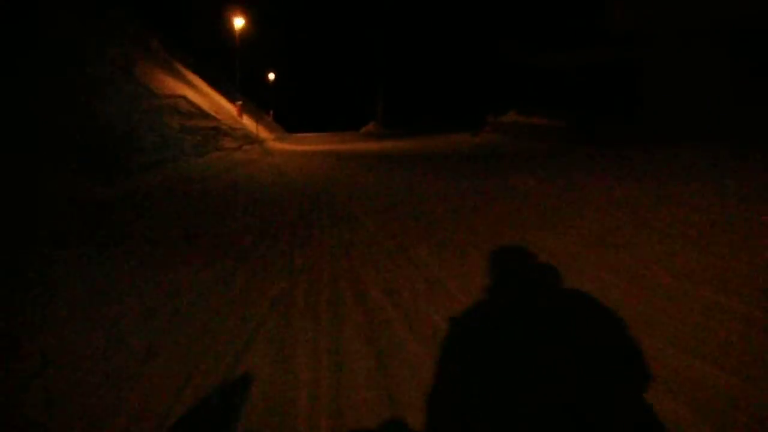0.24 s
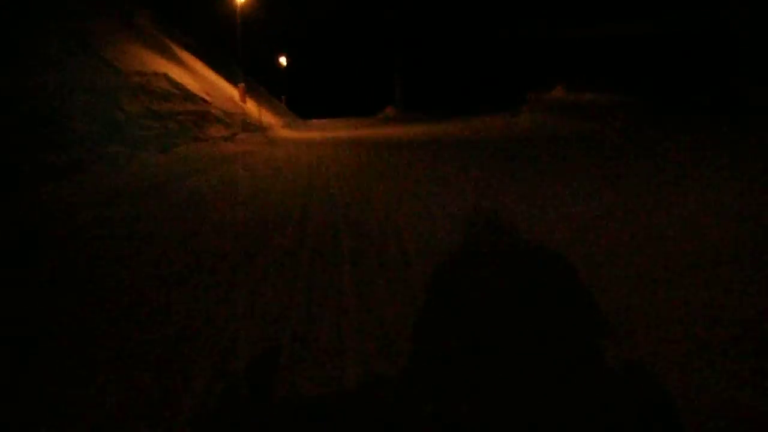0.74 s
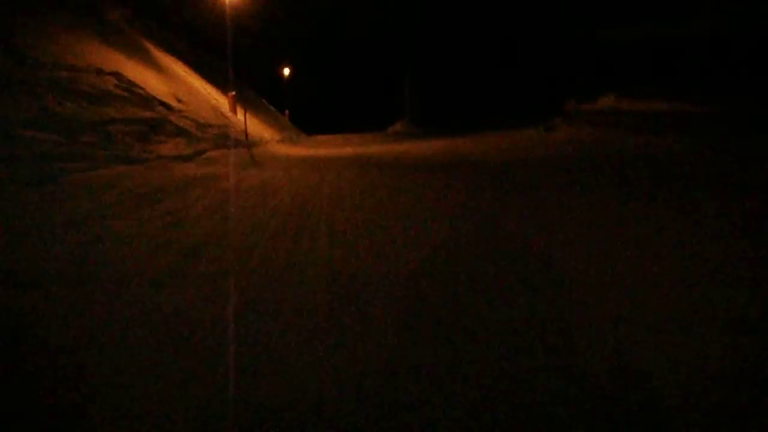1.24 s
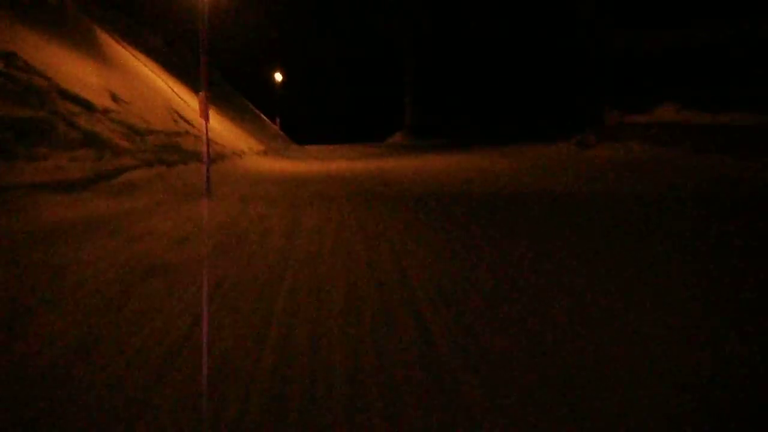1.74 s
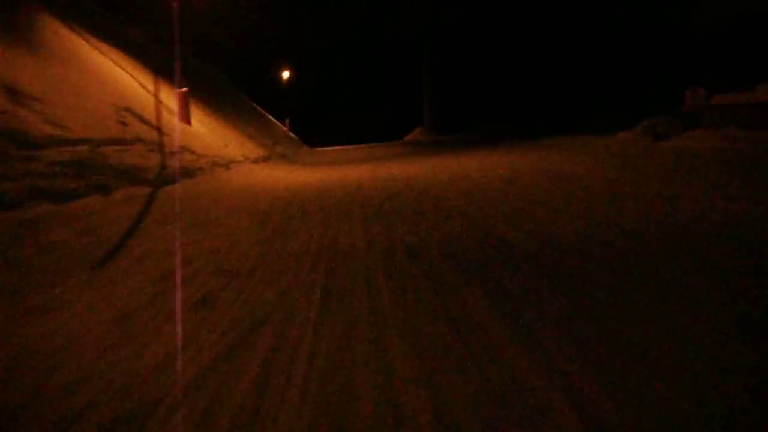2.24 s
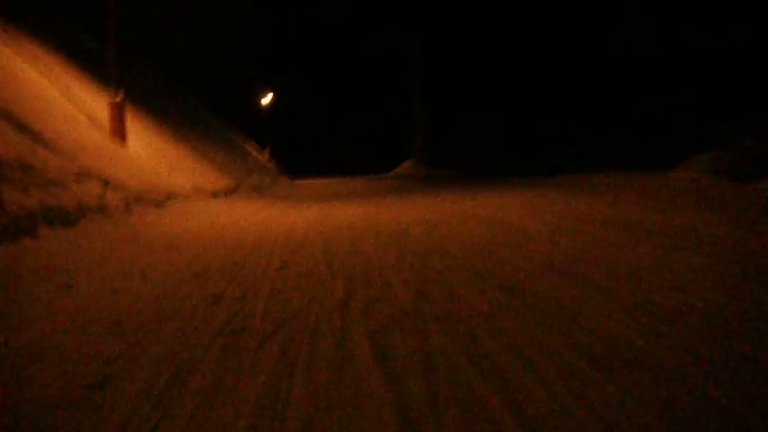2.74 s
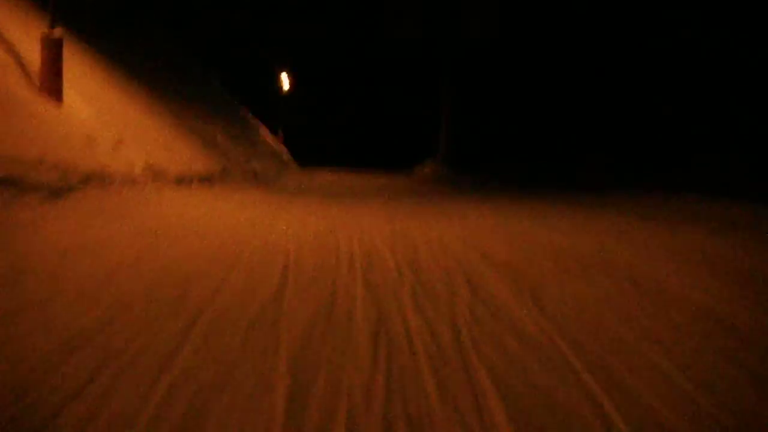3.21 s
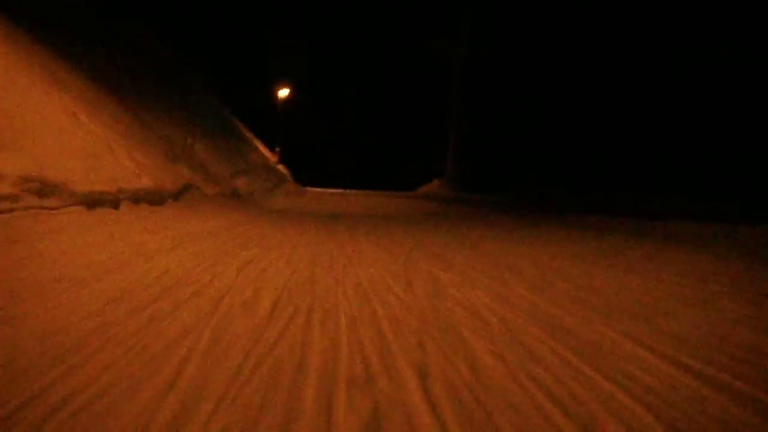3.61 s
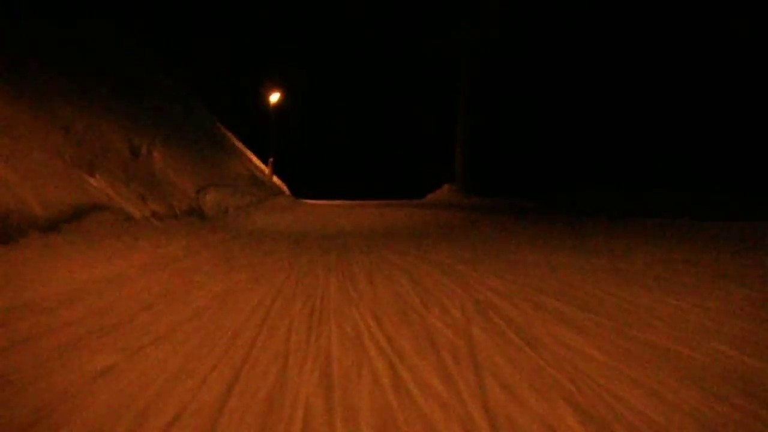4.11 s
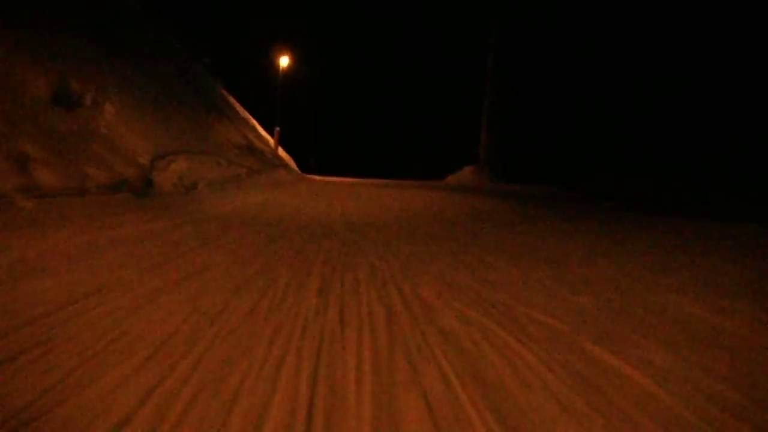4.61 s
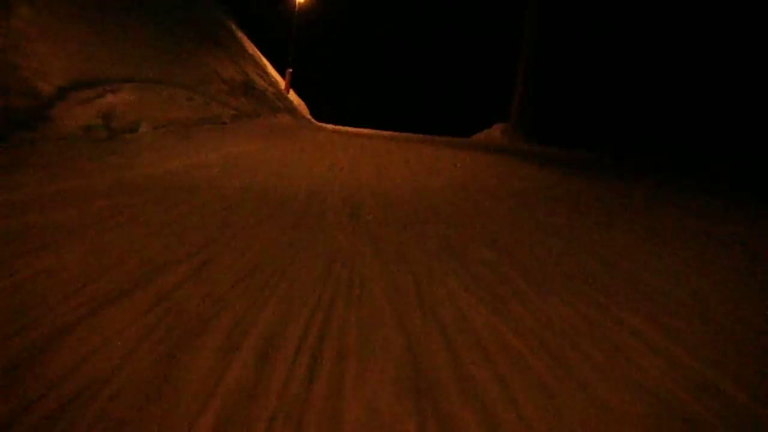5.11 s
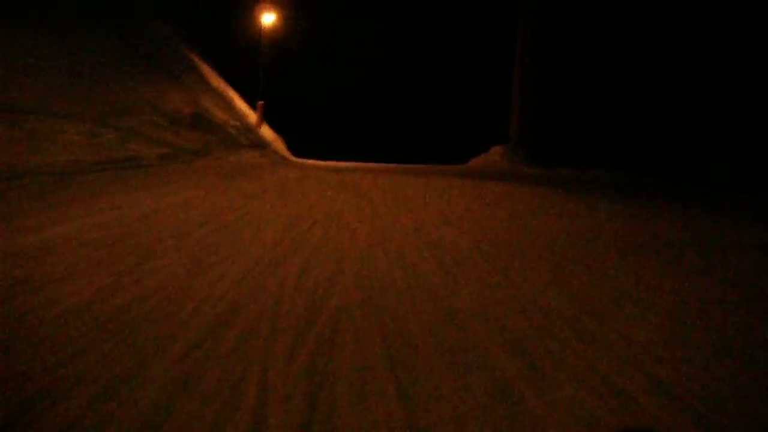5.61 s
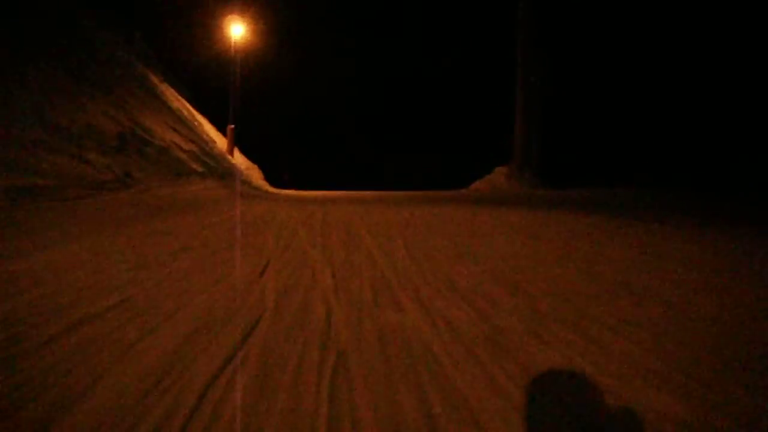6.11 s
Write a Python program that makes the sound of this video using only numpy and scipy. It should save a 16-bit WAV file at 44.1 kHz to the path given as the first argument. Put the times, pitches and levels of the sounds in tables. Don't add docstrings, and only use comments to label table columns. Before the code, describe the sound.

Outdoors at night, a sled slides down packed snow with a dense, bright hiss and gritty scrape. Just before one second the frame squeaks, bangs on a ridge and lifts; the friction drops while loose parts rattle, then returns with a ringing landing. Ice lumps tick and snap through the rest of the run. A small enclosed mono camera on board adds boxy resonance, wind rumble and rushing air.

```python
import sys
import numpy as np
from scipy import signal
from scipy.fft import rfft, irfft
from scipy.io import wavfile

SR = 44100
rng = np.random.default_rng(int(sys.argv[2]) if len(sys.argv) > 2 else 0)


def log_audio(samples):
    frames = np.atleast_2d(samples).T
    limited = np.clip(frames, -1, 1)
    pcm = np.round(limited * 32767).astype(np.int16)
    wavfile.write(sys.argv[1], SR, pcm)


def gain_from_db(level_db):
    decades = np.asarray(level_db, float) / 20
    return 10 ** decades


N = 280035


def rms_one(x):
    return x / np.sqrt(np.mean(x ** 2) + 1e-20)


def in_time(rows):
    s, *columns = np.transpose(rows)
    return [np.interp(np.arange(N) / SR, s, column) for column in columns]


def drift(rate):
    pole = np.exp(-32 * np.pi * rate / SR)
    settling = 3000
    noise = rng.standard_normal(N // 16 + settling + 2)
    slow = signal.lfilter([1], [1, -2 * pole, pole * pole], noise)[settling:]
    return np.interp(np.arange(N) / 16, np.arange(len(slow)), rms_one(slow))


def swell(t, rise):
    age = t / max(rise, 0.0005)
    return age ** 2 * np.exp(2 - 2 * age)


def colour(x, spectrum):
    # (frequency [Hz], width [Hz], boost [dB])
    case_modes = [(2050, 280, 2), (2540, 95, 0), (3120, 120, 2), (3700, 220, 2.5), (4460, 160, 0.5),
                  (5700, 120, -3.5), (5860, 180, 3), (7750, 300, -1), (8100, 440, 1), (8840, 250, -0.5),
                  (12030, 420, 3.5)]
    size = 2 ** 14
    hz = np.fft.rfftfreq(size, 1 / SR) + 1
    at, level_db = np.transpose(spectrum)
    octaves_outside = np.maximum(np.log2(at[0] / hz), 0) + np.maximum(np.log2(hz / at[-1]), 0)
    db = np.interp(np.log(hz), np.log(at), level_db)
    db = db - np.minimum(30 * octaves_outside, 60)
    db = db + sum(boost_db / (1 + (2 * (hz - f) / width) ** 2) for f, width, boost_db in case_modes)
    cepstrum = irfft(db * np.log(10) / 20)[:size // 2]
    cepstrum[1:] *= 2
    response = irfft(np.exp(rfft(cepstrum, size)))[:size // 2]
    return signal.fftconvolve(x, response / np.sqrt(np.sum(response ** 2)))[:N]


def whines():
    # (frequency [Hz], level [dB], phase wander [rad])
    tones = [(11719, -53, 1.5), (15734.3, -59.5, .05)]
    t = np.arange(N) / SR
    return sum(np.sqrt(2) * gain_from_db(level_db) * np.sin(2 * np.pi * hz * t + wander * drift(4.6))
               for hz, level_db, wander in tones)


def air():
    # (frequency [Hz], density [dB per Hz])
    air_spectrum = [(590, -51), (1000, -13), (1380, -12), (1500, -4), (1750, -3), (3220, -1), (4170, -6),
                    (5750, 0), (6330, -12), (8280, -2), (13000, -27)]
    level_db = -36.5
    return gain_from_db(level_db + 3.1 * drift(12)) * rms_one(colour(rng.standard_normal(N), air_spectrum))


def rumble(shake_db):
    # (frequency [Hz], density [dB per Hz])
    rumble_spectrum = [(12, -12), (20, -0.5), (49, -3), (96, -8.5), (227, -6), (396, -9.5), (533, -8),
                       (770, -15.5), (1110, -19.5), (1300, -29), (1690, -51), (2860, -120)]
    mean_pressure_db, fade_db_per_s = -40, 0.5
    level_db = mean_pressure_db - fade_db_per_s * np.arange(N) / SR + shake_db
    flicker_db = 0.23 * drift(15) + 0.89 * drift(40)
    return gain_from_db(level_db + flicker_db) * rms_one(colour(rng.standard_normal(N), rumble_spectrum))


def thumps():
    # (time [s], peak [dB], pitch [Hz])
    jolts = [(.737, -28.5, 267), (.902, -29, 490), (.926, -22, 230), (.928, -23, 510), (1.031, -45, 200),
             (1.372, -29, 250), (2.357, -31, 320), (2.372, -33, 710), (3.797, -36, 320),
             (5.032, -30.5, 454), (5.329, -39, 320)]
    rise_s = 0.0028
    out, t = np.zeros(N), np.arange(SR // 20) / SR
    for s, peak_db, hz in jolts:
        out[round(s * SR):][:len(t)] += gain_from_db(peak_db) * swell(t, rise_s) * np.sin(2 * np.pi * hz * t)
    return out


def creak():
    # (time [s], pitch [Hz], level [dB])
    squeak = [
        (.848, 1450, -60),
        (.856, 1460, -34),
        (.88, 1510, -32),
        (.9, 1500, -37),
        (.913, 1500, -29),
        (.93, 1510, -60),
    ]
    hz, level_db = in_time(squeak)
    phase = 2 * np.pi * np.cumsum(hz + 45 * drift(120)) / SR
    return np.sqrt(2) * gain_from_db(level_db + 4.0 * drift(150)) * np.sin(phase)


def cracks(events, spectrum, crunch_db, ring_db, thud_db, thud_hz):
    crunch, tones, t = np.zeros(N), np.zeros(N), np.arange(SR // 20) / SR
    draws = rng.standard_normal((len(events), len(t)))
    for (s, peak_db, ring_hz, rise), noise in zip(events, draws):
        start = round(s * SR)
        at = slice(start, start + len(t))
        shape = gain_from_db(peak_db) * swell(t, rise)
        ring = gain_from_db(ring_db) * np.sin(2 * np.pi * ring_hz * t)
        thud = gain_from_db(thud_db) * np.sin(2 * np.pi * thud_hz * t)
        crunch[at] += gain_from_db(crunch_db) * shape * noise
        tones[at] += shape * (ring + thud)
    return tones + colour(crunch, spectrum)


def frame_impacts():
    # (time [s], peak [dB], ring [Hz], rise [s])
    knock = [
        (.885, -14, 3200, .0026),
        (.8965, -10, 8000, .0034),
        (.902, -5.5, 2200, .0033),
        (.9095, -9, 2370, .004),
        (.926, -1, 2470, .003),
        (.9292, 4, 4750, .0011),
        (.9335, -2.5, 3000, .0024),
    ]
    # (time [s], peak [dB], ring [Hz], rise [s])
    rattle = [
        (.9625, -13, 3350, .003),
        (.9755, -14, 2490, .0017),
        (.982, -16, 3160, .002),
        (.992, -14, 2710, .002),
        (1.0, -16, 4300, .002),
        (1.031, -18, 1800, .0035),
    ]
    # (frequency [Hz], density [dB per Hz])
    knock_spectrum = [(590, -51), (1000, -21), (1820, -2), (2820, -5.5), (3120, -1), (3600, -8.5),
                      (4900, -3), (6180, -9), (7880, -8.5), (10900, -12), (14000, -51)]
    return cracks([*knock, *rattle], knock_spectrum, crunch_db=-12.5, ring_db=-16.5, thud_db=-38, thud_hz=490)


def ice_lumps():
    # (time [s], peak [dB], ring [Hz])
    lumps = [(0.353, -7, 2540), (.414, -9, 3120), (0.462, -7, 2570), (1.1094, -19.5, 2600),
             (1.324, -7.5, 2550), (1.379, -13, 3000), (1.3994, -13, 3080), (1.6063, -9.5, 3240),
             (1.649, -8.5, 3050), (2.0594, -13, 3120), (2.3574, -8.5, 2450), (2.444, -9, 2570),
             (3.0904, -4, 3130), (3.1129, -7, 2620), (3.128, -8, 2570), (3.5122, -8, 2470),
             (3.5549, -4, 3160), (3.638, -9, 3700), (3.697, -13, 3220), (3.7966, -5, 3040),
             (3.931, -7.5, 3130), (4.0348, -9, 3700), (4.212, -14, 3850), (4.3227, -6.5, 3210),
             (4.4517, -10, 2570), (5.0341, -9, 2750), (5.3086, -7.5, 2700), (5.329, -5, 2550),
             (5.3778, -18, 2580), (5.4247, -14, 3210)]
    # (frequency [Hz], density [dB per Hz])
    lump_spectrum = [(590, -39), (1000, -15), (1350, -12.5), (2560, 0.5), (5420, -6.5), (6910, -5.5),
                     (8060, 0), (9620, -10), (12100, -15), (14000, -48)]
    rise_s = 0.0022
    events = [(*lump, rise_s) for lump in lumps]
    return cracks(events, lump_spectrum, crunch_db=-11.5, ring_db=-12.5, thud_db=-31, thud_hz=320)


def slope():
    # (time [s], runner pressure as scrape level [dB], iciness [dB])
    course = [
        (0, -27.5, 0),
        (.9, -25.5, 1),
        (1.5, -29.5, 2.5),
        (2.6, -27, 1),
        (3.3, -29, 1.5),
        (4.2, -28, -11.5),
        (4.8, -29.5, 1),
        (5.5, -31, 1.5),
        (6.35, -28, -4),
    ]
    return in_time(course)


def humps():
    # (time [s], extra pressure [dB], length [s], extra grit [dB])
    bumps = [(0, 2, 0.12, 0.3), (.423, 2, 0.13, .5), (.6, 1.8, .169, -3), (0.704, 0.5, 0.18, 2),
             (1.335, 0.5, .115, -0.3), (1.427, 2.5, 0.095, -1), (1.67, 0.5, 0.056, 2),
             (1.975, 2.5, 0.12, -0.3), (2.25, 1, .053, 1), (2.371, 2, .071, 2.4), (2.502, 1, 0.23, 0.9),
             (2.658, 2, .139, 1), (2.847, 4.5, 0.1, -0.8), (3.048, 6, 0.18, 1), (3.494, 4, 0.096, -0.6),
             (3.626, 3.5, 0.1, -0.5), (3.79, 1, 0.12, .5), (3.946, 2.5, 0.052, -0.5), (4.04, 2.5, .1, -2),
             (4.352, 2, 0.16, 0.1), (4.477, 4, 0.059, -1), (4.725, 2.5, 0.2, -1.7), (5.008, 1.3, 0.12, 2),
             (5.124, 3, .066, 0), (5.318, 3.5, 0.25, 1.5), (5.65, 2.1, 0.17, .9), (5.858, 2.5, 0.13, .7),
             (6.16, 1.7, 0.25, 1)]
    s, press_db, length, grit_db = np.transpose(bumps)
    t = np.arange(0, N + 64, 64) / SR
    bells = np.exp(-(2 * (t[:, None] - s) / length) ** 2)
    return [np.interp(np.arange(N) / SR, t, bells @ db) for db in (press_db, grit_db)]


def hop_db(fade):
    takeoff_s, touchdown_s, settle_s = 0.934, 1.126, 0.19
    lift_db = -11
    t = np.arange(N) / SR
    lifted = 1 - np.exp(-np.maximum(t - takeoff_s, 0) / max(fade, 0.002))
    back = np.clip((t - touchdown_s) / settle_s, 0, 1)
    return lift_db * lifted * (1 - back)


def crushed_snow(per_s, spread_db, grain_share):
    signs = rng.choice([-1, 1], N)
    sizes = gain_from_db(spread_db * np.minimum(rng.exponential(1, N), 4)) * signs
    breaks = rng.random(N) < per_s * gain_from_db(5.0 * drift(25)) / SR
    share = np.clip(grain_share, 0, 1)
    return np.sqrt(1 - share) * rng.standard_normal(N) + np.sqrt(share) * rms_one(sizes * breaks)


def patches(x, low_hz, high_hz, patchy_db):
    edges = np.geomspace(low_hz, min(high_hz, 0.4 * SR), 9)
    out = x
    for edge in zip(edges, edges[1:]):
        band = signal.sosfilt(signal.butter(1, edge, "band", fs=SR, output="sos"), x)
        out = out + (gain_from_db(patchy_db * drift(5.8)) - 1) * band
    return out


def deck(friction, icy_db, grit_db):
    # (frequency [Hz], width [Hz], level [dB])
    modes = [(2550, 146, -3), (3130, 120, -9), (3700, 220, -18.5), (1950, 230, -6.5)]
    landing_peak_db, landing_s, landing_length_s = 14, 1.4, 0.24
    t = np.arange(N) / SR
    landing_db = landing_peak_db * np.exp(-(2 * (t - landing_s) / landing_length_s) ** 2)
    pushes_db = [icy_db + grit_db, landing_db + 1.5 * grit_db, 0, 0]
    out = 0
    for (hz, width, level_db), push_db in zip(modes, pushes_db):
        r = np.exp(-np.pi * width / SR)
        mode = signal.lfilter([1, 0, -1], [1, -2 * r * np.cos(2 * np.pi * hz / SR), r * r], friction)
        out = out + gain_from_db(level_db - 7.5 + push_db + 2.7 * drift(5.3)) * rms_one(mode)
    return out


def runners(scrape_db, hiss_db, icy_db, grit_db):
    # (frequency [Hz], density [dB per Hz])
    scrape_spectrum = [(530, -39.5), (900, -22.5), (1360, -18.5), (1850, -5), (2310, -2.5), (2530, 0.5),
                       (2870, 0), (3160, -0.5), (4090, -7), (5840, -10.5), (6500, -15), (8450, -36.5),
                       (14300, -120)]
    hiss_spectrum = [(2650, -40.5), (4500, -9), (5870, -7.5), (6350, -7), (8330, 1.5), (9490, -5.5),
                     (10600, -3.5), (12000, -9), (13700, -23.5), (15700, -32)]
    load_db = 0.55 * drift(27) + 0.93 * drift(74)
    coarse = crushed_snow(per_s=1200, spread_db=2.0, grain_share=0.083)
    fine = crushed_snow(per_s=2700, spread_db=7.0, grain_share=0.14)
    scrape = patches(colour(coarse, scrape_spectrum), low_hz=1300, high_hz=5400, patchy_db=0.77)
    hiss = patches(colour(0.44 * coarse + fine, hiss_spectrum), low_hz=4440, high_hz=15400, patchy_db=1.04)
    body = gain_from_db(-1.0) * rms_one(scrape) + deck(fine, icy_db, grit_db)
    return gain_from_db(scrape_db + load_db) * body + gain_from_db(hiss_db + 0.47 * load_db) * rms_one(hiss)


def scene():
    slope_db, icy_db = slope()
    press_db, grit_db = humps()
    weight_db = slope_db + press_db
    scrape_db = weight_db + grit_db + hop_db(fade=0.02)
    hiss_db = weight_db + 2.29 + 1.05 * hop_db(fade=0.008)
    shake_db = 0.55 * (weight_db + grit_db - weight_db.mean()) + 0.95 * hop_db(fade=0.11)
    near = air() + rumble(shake_db) + thumps() + creak()
    near = near + frame_impacts() + ice_lumps()
    near = near + runners(scrape_db, hiss_db, icy_db, 0.47 * grit_db)
    return np.stack([near, near])


def low_pass(x):
    return signal.sosfilt(signal.butter(12, 15810, fs=SR, output="sos"), x)


def record(dry):
    mono = 1.2 * np.tanh(dry[0] / 1.2) + whines()
    return low_pass(np.stack([mono, mono]))


dry = scene()
out = record(dry)
log_audio(out)
```